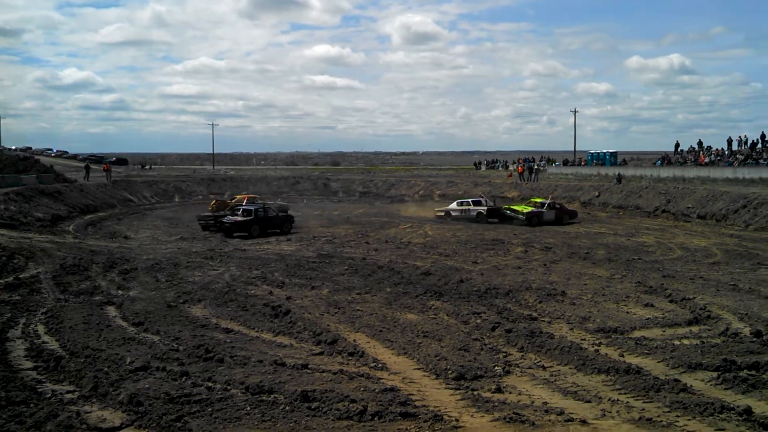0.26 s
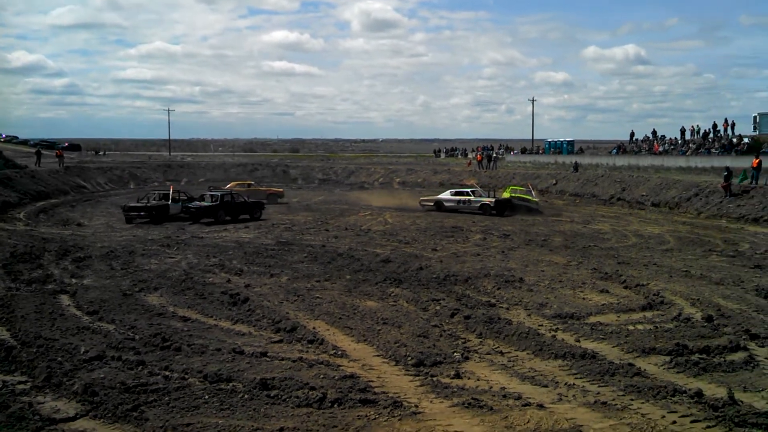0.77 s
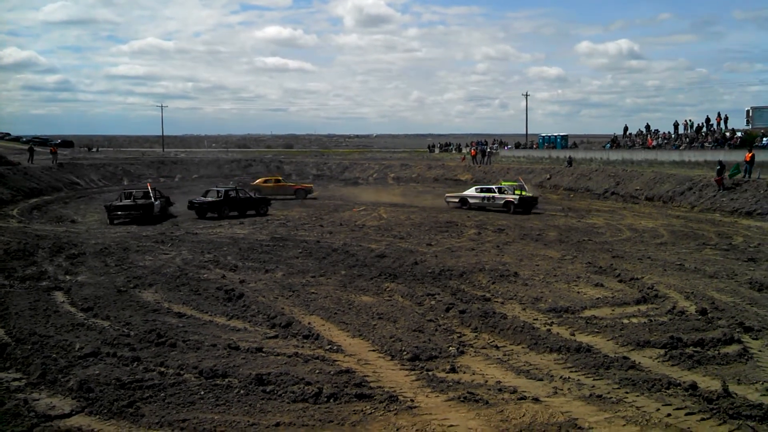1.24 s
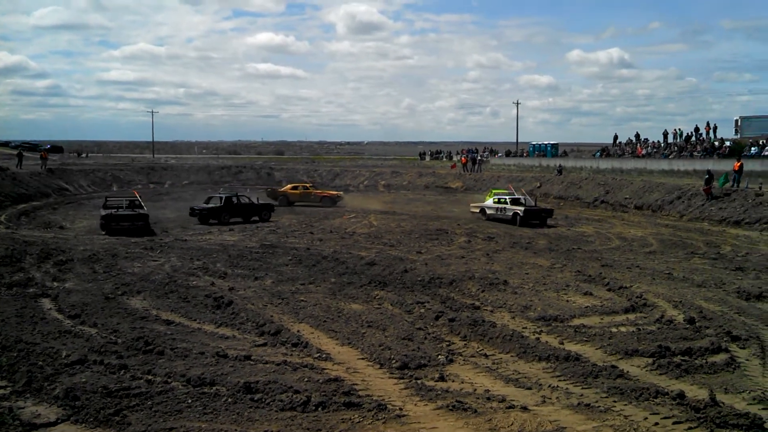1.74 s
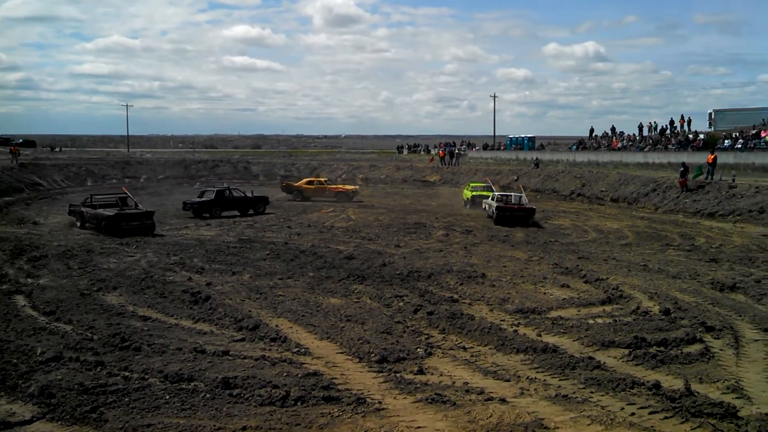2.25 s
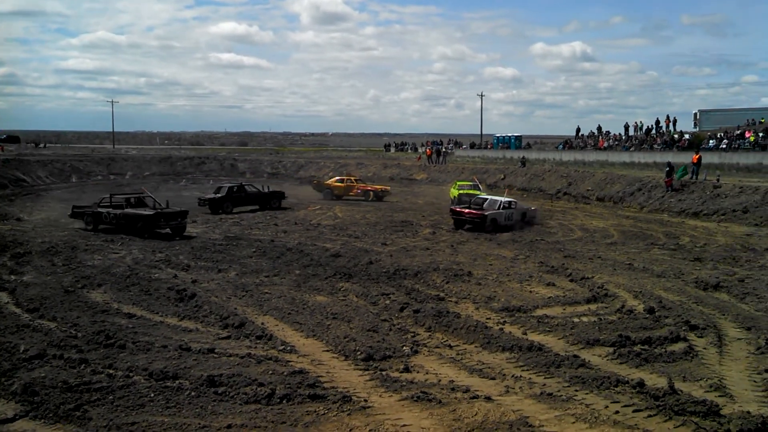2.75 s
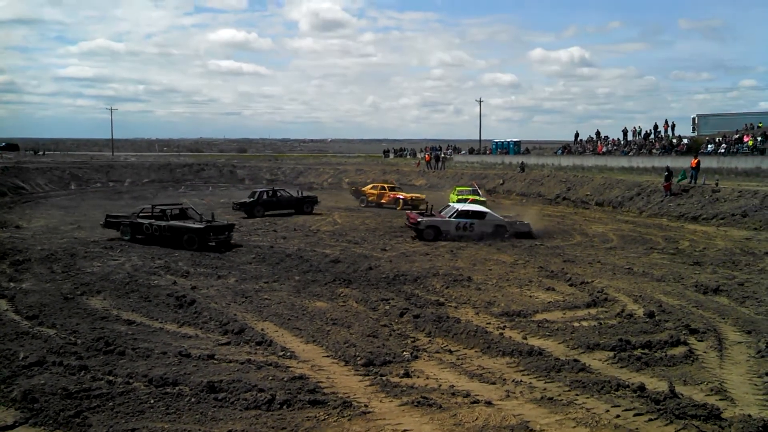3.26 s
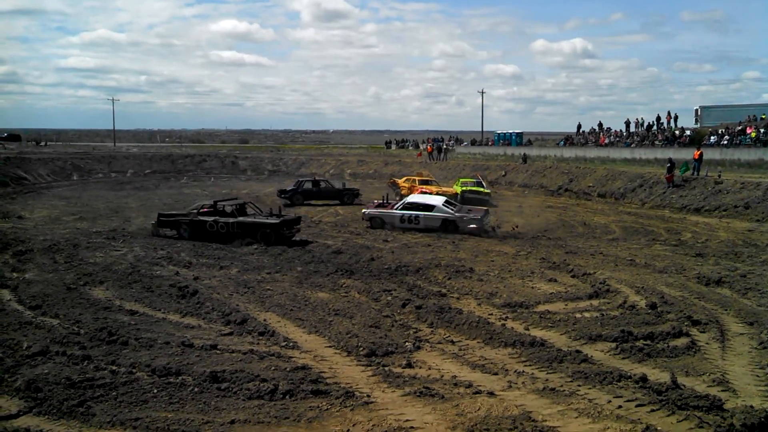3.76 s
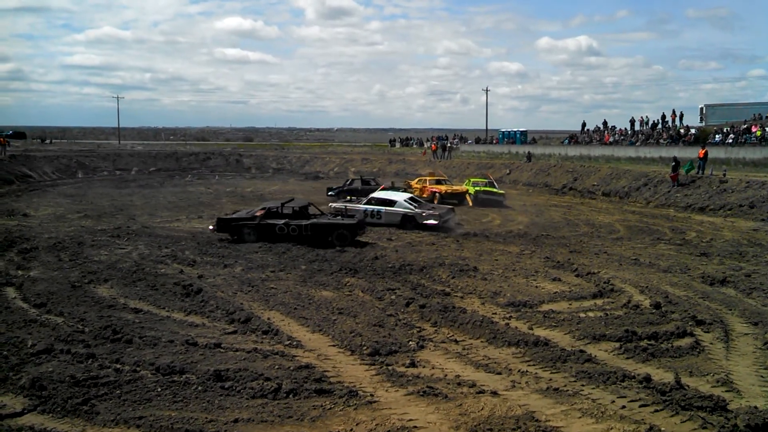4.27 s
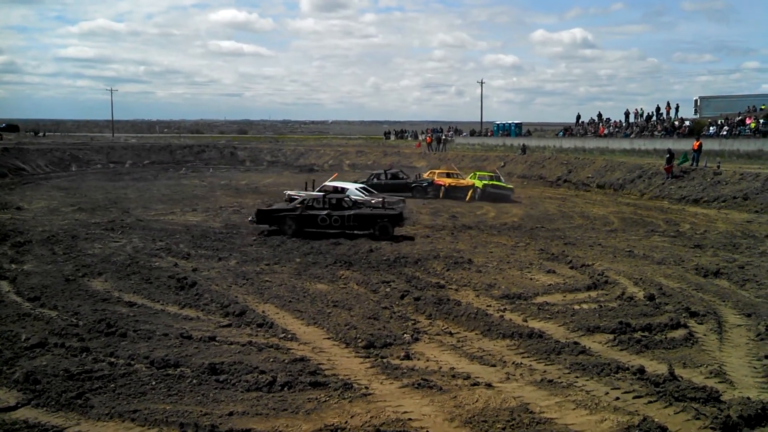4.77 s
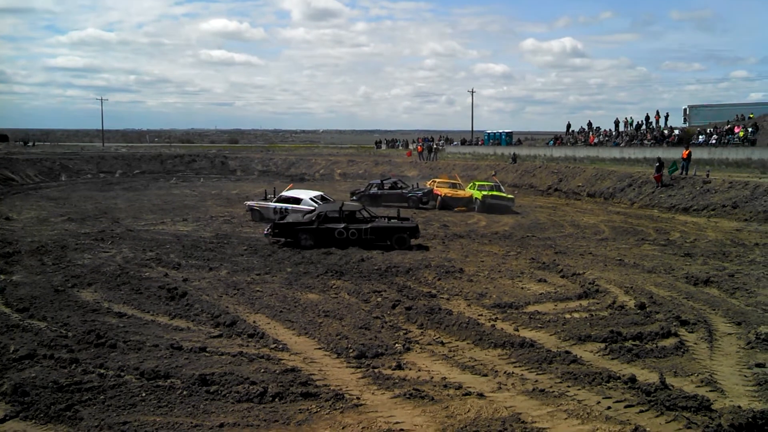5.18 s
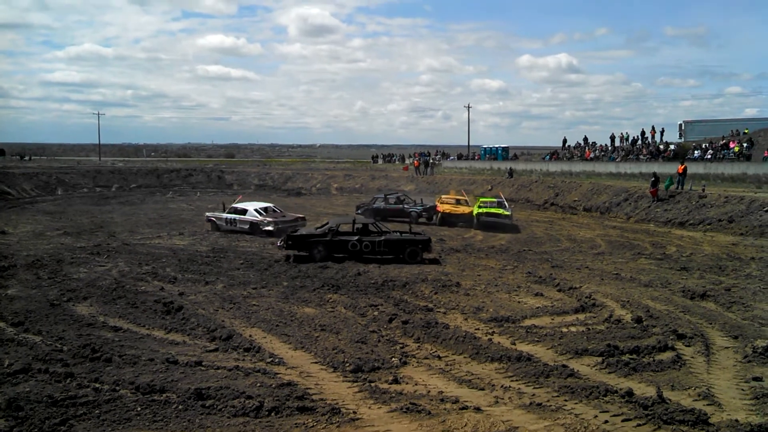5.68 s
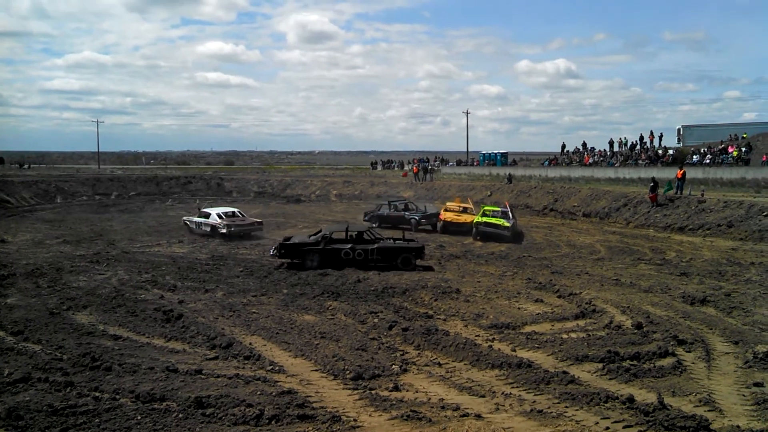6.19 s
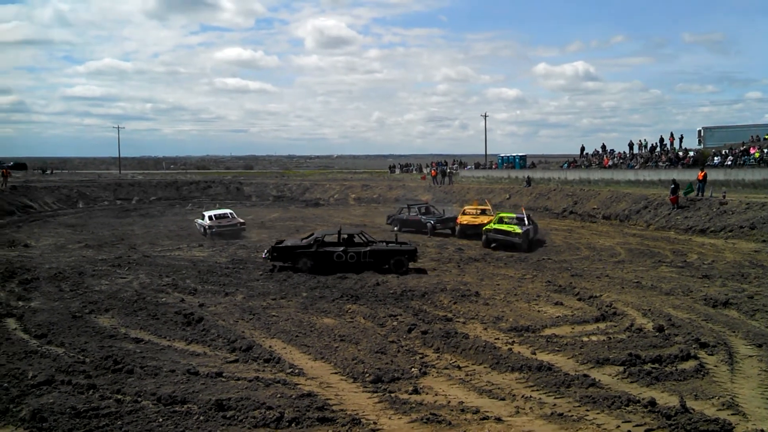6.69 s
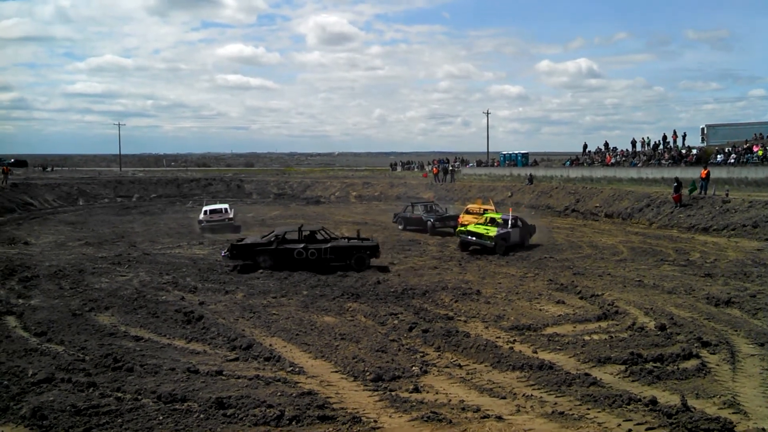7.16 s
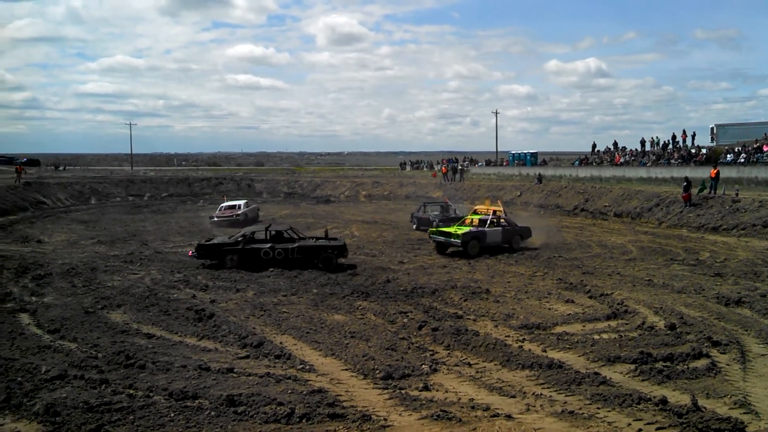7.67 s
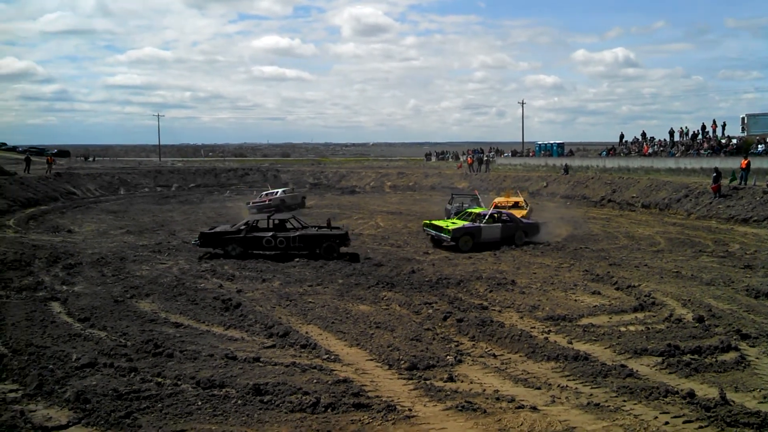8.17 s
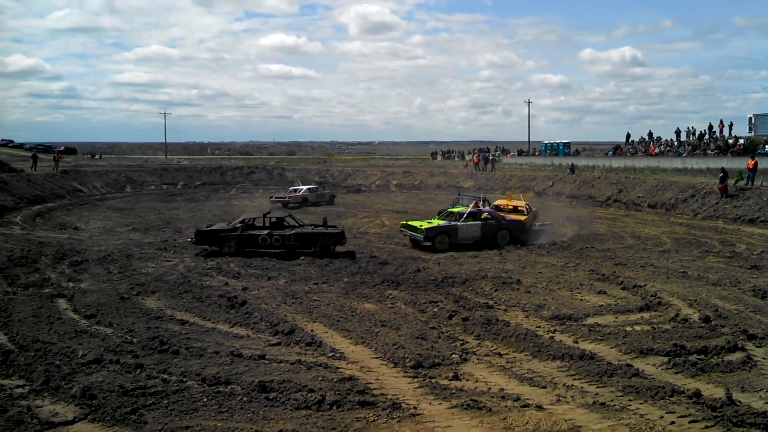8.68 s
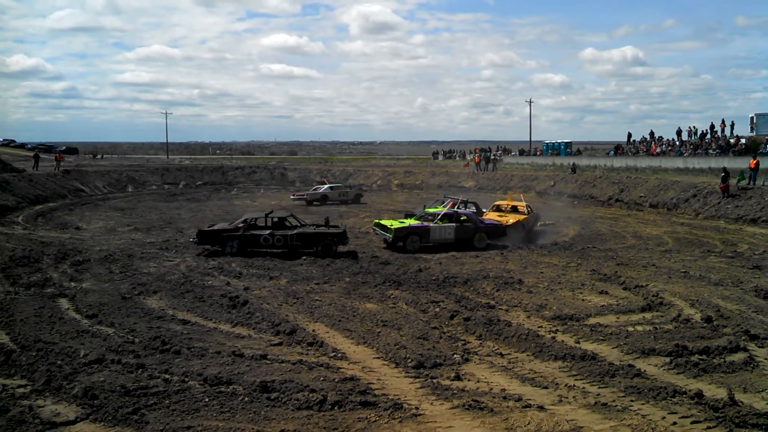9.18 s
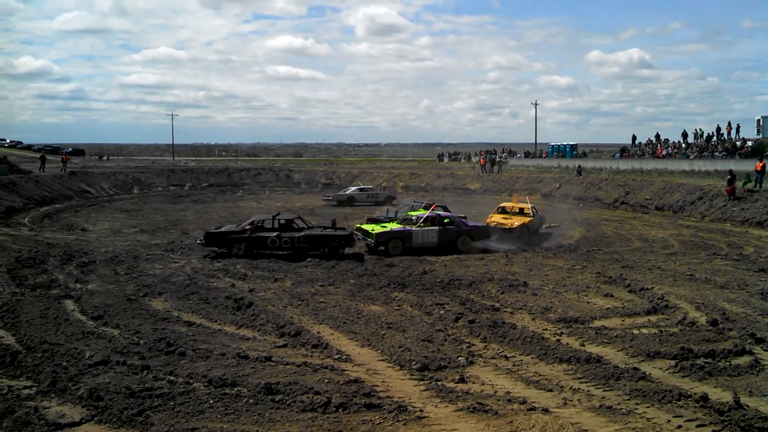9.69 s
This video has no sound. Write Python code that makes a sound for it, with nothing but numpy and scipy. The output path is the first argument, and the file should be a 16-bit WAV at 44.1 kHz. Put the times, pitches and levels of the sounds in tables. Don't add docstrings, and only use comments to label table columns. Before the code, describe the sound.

Old unmuffled eight-cylinder cars rev hard in overlapping bursts across an open dirt arena, exhausts rasping, popping and spitting over a distant engine roar.

```python
import sys
import numpy as np
from scipy import signal
from scipy.fft import rfft, irfft, next_fast_len
from scipy.io import wavfile
from scipy.ndimage import uniform_filter1d

SR = 44100
rng = np.random.default_rng(int(sys.argv[2]) if len(sys.argv) > 2 else 0)


def file_out(sig):
    cols = np.atleast_2d(sig).T
    lim = np.clip(cols, -1, 1)
    pcm = np.round(lim * 32767).astype(np.int16)
    wavfile.write(sys.argv[1], SR, pcm)


def magnitude_from_level(level_db):
    exponent = np.asarray(level_db, float) / 20
    return 10 ** exponent


N = 438348
FREQ = np.maximum(np.fft.rfftfreq(next_fast_len(N + 4096), 1 / SR), 1)


def read(table, column=1):
    rows = np.array(table, float)
    return np.interp(np.log(FREQ), np.log(rows[:, 0]), rows[:, column])


def causal(db):
    cepstrum = irfft(db * np.log(10) / 20)
    half = len(cepstrum) // 2
    cepstrum[1:half] *= 2
    cepstrum[half + 1:] = 0
    return np.exp(rfft(cepstrum))


def through(x, response):
    size = 2 * (len(FREQ) - 1)
    return irfft(rfft(x, size) * response, size)[..., :N]


def unit(x):
    return x / np.sqrt(np.mean(x ** 2))


def unit_gain(response):
    return np.sqrt(np.mean(abs(response) ** 2))


def walk(rate, size=N):
    hold = int(SR / rate)
    values = rng.standard_normal(size // hold + 1)
    steps = np.repeat(values, hold)
    slewed = uniform_filter1d(uniform_filter1d(steps, hold), hold)
    return 1.3 * slewed[:size]


def port_noise(alike, size=N):
    same, own = rng.standard_normal((2, size))
    return np.array([same, alike * same + np.sqrt(1 - min(alike, 1) ** 2) * own])


def far_cars():
    # t/s, roar level/dB
    roar_levels = [(0.0, -12.5), (0.58, -16.5), (0.72, -24), (1.0, -22), (1.35, -15), (2.08, -12.5),
                   (3.18, -12.5), (3.76, -18), (4.18, -10.5), (4.43, -19), (5.07, -17), (5.73, -18.5),
                   (6.31, -12.5), (7.06, -16), (8.69, -16.5), (9.14, -22.5), (9.47, -16), (9.63, -19),
                   (9.94, -15)]
    # f/Hz, level/dB
    roar_colour = [(30, -8), (100, 3), (300, -2), (1000, -3), (3000, -5.5), (8000, -12.5), (16000, -11)]
    s, level_db = np.transpose(roar_levels)
    db = np.interp(np.arange(N) / SR, s, level_db)
    colour = magnitude_from_level(read(roar_colour))
    roar = 0
    for octave, hz in enumerate(45 * 2. ** np.arange(9)):
        band = np.exp(-np.log2(FREQ / hz) ** 2 / .5) * colour
        dulling_db = 0.03 * octave * (db - db.mean())
        swell_db = 1.6 * walk(2.97) + 1.87 * walk(25) + dulling_db
        alike = 1 / (1 + (hz / 2500) ** 2)
        roar = roar + magnitude_from_level(swell_db) * through(port_noise(alike), band)
    return magnitude_from_level(-11.5 + db) * unit(roar)


def pops():
    # t/s, peak level/dB, thump minus crack/dB
    pop_events = [(0.6439, -19.5, -15), (0.7116, -18.5, 3), (0.9994, -23, -4), (1.0334, -23, -4),
                  (1.116, -24, -3), (1.1689, -17, -8), (1.236, -31, 0), (1.4994, -17, -8), (2.5694, -25, 7),
                  (3.3083, -18, 3), (3.873, -28, 24), (4.1779, -23, 16), (4.3997, -27, -1),
                  (4.5635, -32, 8), (4.6204, -25, 14), (5.0895, -14, -1), (5.1493, -13, -12),
                  (5.2008, -22, 7), (5.2894, -36, -6), (6.8189, -20, 22), (7.3666, -37, 14)]
    size = 2000
    out, t = np.zeros((2, N + size)), np.arange(size) / SR
    for s, db, thump_db in pop_events:
        start = int(s * SR)
        crack = 1.7 * np.exp(-t / .003) * uniform_filter1d(rng.standard_normal((2, size)), 3)
        thump = magnitude_from_level(thump_db - 21.5) * np.exp(-t / 0.0023) * np.sin(2 * np.pi * 600 * t)
        out[:, start:start + size] += magnitude_from_level(db + 1.5) * (crack + thump)
    return out[:, :N]


def ticks():
    # t/s, peak level/dB
    spit_events = [(1.069, -20), (1.113, -20), (1.1529, -15), (1.1704, -21), (1.1883, -17), (1.234, -14),
                   (1.4512, -18), (1.7088, -18), (1.8129, -26), (1.868, -15), (1.9212, -22), (2.3361, -20),
                   (2.4101, -19), (2.8336, -22), (2.9833, -18), (3.0047, -20), (3.1932, -16), (3.2851, -14),
                   (3.3305, -11), (4.1172, -19), (4.207, -16), (4.402, -17), (4.5642, -16), (4.6017, -20),
                   (4.6245, -16), (4.6589, -14), (4.6754, -10), (4.6954, -10), (4.735, -12), (4.7832, -12),
                   (4.8181, -10.5), (4.856, -12), (4.8924, -17), (4.9149, -18), (4.9255, -19),
                   (4.9628, -16), (5.0376, -24), (5.09, -12), (5.1384, -11), (5.2356, -17), (5.2815, -12),
                   (5.3384, -23), (6.5487, -17), (6.8894, -20), (7.293, -17), (7.7479, -18), (8.0183, -31),
                   (8.644, -27), (9.3542, -21), (9.7339, -32)]
    # t/s, peak level/dB
    coasting_spits = [(0.66, -21), (0.6866, -18), (0.6954, -18), (0.8345, -39), (0.855, -37), (0.8744, -37),
                      (0.9133, -24), (0.9652, -29), (0.9844, -33), (1.049, -20), (1.2044, -18),
                      (1.252, -27), (1.285, -16), (1.3603, -23), (1.479, -21)]
    size = 600
    out, t = np.zeros((2, N + size)), np.arange(size) / SR
    shape = (1 - np.exp(-t / 0.00044)) * np.exp(-t / 0.0042)
    for s, db in [*spit_events, *coasting_spits]:
        start = int(s * SR)
        noise = uniform_filter1d(rng.standard_normal((2, size + 2)), size=3)
        spit = np.diff(noise, n=1)[:, :size] * shape
        out[:, start:start + size] += magnitude_from_level(db + 5.0) * (0.4 * spit[0] + spit)
    return out[:, :N]


def firings(cycles):
    cylinder_levels = [4.5, -1, 2, 5, -4.5, 3.5, -4, 3]
    far_bank = np.array([0, 1, 0, 0, 1, 0, 1, 1])
    at = np.flatnonzero(np.diff(np.floor(8 * cycles))) + 1
    cylinder = np.arange(len(at)) % 8
    strength_chance, time_chance = rng.standard_normal((2, len(at)))
    strength = magnitude_from_level(np.take(cylinder_levels, cylinder) + 1.2 * strength_chance)
    delay_ms = .6 * np.take(far_bank, cylinder) + .08 * time_chance
    place = at + delay_ms * SR / 1000
    n = len(cycles)
    return np.bincount(np.clip(place, 0, n - 1).astype(int), strength, n)


def pipe_note(pulses, pipe_hz, width_hz, pipe_db):
    # f/Hz, level/dB
    exhaust_colour = [(30, 3), (100, 2), (400, -1.5), (900, -4.5), (1800, -9), (3500, -26), (8000, -40)]
    ring = irfft(causal(read(exhaust_colour)))[:4096]
    pressure = pulses - uniform_filter1d(pulses, size=4000)
    note = signal.fftconvolve(pressure, ring)[:len(pulses)]
    b, a = signal.iirpeak(pipe_hz, pipe_hz / width_hz, fs=SR)
    note = note + magnitude_from_level(pipe_db) * signal.lfilter(b, a, note)
    return note / np.sqrt(uniform_filter1d(note ** 2, size=9000))


def locked(exhaust, turns, db):
    wave = np.array([np.cos(2 * np.pi * turns), np.sin(2 * np.pi * turns)])
    left = 2 * np.sum(uniform_filter1d(exhaust * wave, size=4000) * wave, axis=0)
    return magnitude_from_level(db) * wave[0] - left


def gas_puffs(pulses):
    n = len(pulses)
    uneven = pulses * magnitude_from_level(1.0 * walk(200, size=n))
    puff = signal.lfilter([1], [1, -np.exp(-1 / (0.0026 * SR))], uneven)
    puff = uniform_filter1d(puff, size=24)
    return puff / np.sqrt(uniform_filter1d(puff ** 2, size=6000))


def car(curve, layers, orders, pipe_hz, width_hz, pipe_db, lag):
    open_levels = {"a": (-15.5, -28, -28.5, -23), "b": (-29.5, -47, -25.5, -7), "l": (-16, -32.5, -28.5, 8),
                   "j": (-16, -28, -29.5, 12), "k": (-16, -29.5, -31, -3), "c": (-20.5, -28.5, -24.5, 28),
                   "d": (-19.5, -30, -34.5, -18), "m": (-21.5, -28.5, -31, 50), "e": (-18, -20, -29, 16),
                   "f": (-22, -33.5, -25.5, 12), "g": (-18, -31, -26.5, -1), "n": (-22.5, -34.5, -26.5, 10),
                   "h": (-21, -36, -26.5, 17.5), "o": (-22, -40, -27, 3), "p": (-21.5, -36, -25, 5),
                   "i": (-19.5, -32.5, -15, -2)}
    s, hz, throttle_db = np.transpose(curve)
    open_db, gas_db, tone_db, loss_db = open_levels[layers]
    exhaust_db = open_db + throttle_db
    gas_db = gas_db + 1.87 * throttle_db
    tone_db = tone_db + 0.73 * throttle_db + loss_db * np.log2(hz / hz.max())
    start, end = int(s[0] * SR), min(int(s[-1] * SR), N)
    t = np.arange(start, end) / SR
    n = len(t)

    cycle_hz = np.interp(t, s, hz) * (1 + .003 * walk(15, size=n))
    cycles = np.cumsum(cycle_hz) / SR
    pulses = firings(cycles)
    exhaust = magnitude_from_level(np.interp(t, s, exhaust_db) - 13.5) * pipe_note(pulses, pipe_hz, width_hz, pipe_db)
    tone_db = np.interp(t, s, tone_db) - 8.5
    tones = 0
    for order, level_db in orders:
        turns = order * cycles + rng.random()
        tones = tones + locked(exhaust, turns, tone_db + level_db + 2 * walk(12, size=n))
    exhaust = exhaust + tones
    gas = magnitude_from_level(np.interp(t, s, gas_db)) * gas_puffs(pulses) * port_noise(0.33, size=n)

    since = t - s[0] + (s[0] == 0)
    left = s[-1] - t + (s[-1] > 9.9)
    fade = np.clip(np.minimum(since, left) / .04, 0, 1)
    second = np.interp(np.arange(n) - lag / 2, np.arange(n), exhaust)
    return np.pad(fade * np.array([[exhaust, second], gas]), [(0, 0), (0, 0), (start, N - end)])


def bursts():
    # t/s, cycle rate f/Hz, throttle level/dB against open
    rev_a = [
        (0.0, 31.8, 0),
        (0.19, 36, 1.5),
        (0.31, 35.06, 1),
        (0.4, 32.6, 1.3),
        (0.5, 30.86, 0),
        (0.57, 31.13, 0.5),
        (0.62, 31.93, -2.5),
        (0.68, 31.6, -32),
    ]
    rev_b = [
        (0.64, 15.2, -5),
        (0.72, 13.7, 6),
        (0.81, 16, -4.5),
        (0.99, 19.4, -3),
        (1.1, 19, -21),
    ]
    rev_l = [
        (0.98, 18.2, -10),
        (1.11, 22.2, -1.5),
        (1.32, 20.8, -6),
        (1.44, 20.5, 0),
        (1.6, 21.8, -0.5),
        (1.85, 20.2, -1.5),
        (1.9, 20.6, 2),
        (2.0, 21.8, 0),
        (2.1, 22.3, 4),
    ]
    rev_j = [
        (2.05, 22.2, -4),
        (2.16, 23.6, 0),
        (2.3, 25.11, -1.5),
        (2.48, 27.82, 1.5),
        (2.62, 29.32, 2),
        (2.73, 29.27, -2),
        (2.8, 28.65, -27),
    ]
    rev_k = [
        (2.78, 27.18, -5),
        (2.85, 27.5, -1),
        (2.95, 28.65, 1.5),
        (3.05, 29.85, 1.5),
        (3.15, 31.45, 1),
        (3.24, 32.2, -0.5),
        (3.32, 31.42, -10),
        (3.4, 30.4, 7),
    ]
    rev_c = [
        (3.2, 20.16, -1.5),
        (3.33, 22.85, -1),
        (3.39, 24.43, -0.2),
        (3.54, 26.48, -1),
        (3.62, 26.7, 0),
        (3.8, 25, -8),
    ]
    rev_d = [
        (3.6, 22.21, -3),
        (3.74, 22.25, -10),
        (3.78, 22.57, -10),
        (4.09, 24.52, 0.5),
        (4.15, 24.83, 0.5),
        (4.3, 25.13, -1.5),
        (4.42, 25, 0.5),
    ]
    rev_m = [
        (4.2, 26.4, -14),
        (4.3, 27.37, -7),
        (4.57, 26.57, -1.5),
        (4.82, 27.85, -1),
        (5.05, 26.4, 0.5),
        (5.3, 25.12, 0),
        (5.53, 25.17, -0.5),
        (5.68, 24.9, -3),
        (5.9, 23.84, -0.5),
    ]
    rev_e = [
        (5.15, 20.12, -2),
        (5.2, 20.65, -4),
        (5.35, 22.5, -9.5),
        (5.57, 25.42, -4),
        (5.7, 25.03, -38.5),
    ]
    rev_f = [
        (5.7, 18.3, -15.5),
        (5.9, 21.5, -0.5),
        (6, 23.2, -2.5),
        (6.45, 23.6, -1),
        (6.65, 23.9, -2),
        (6.85, 23.5, 1),
        (7.3, 23.1, -6.5),
        (7.5, 21, -13),
    ]
    rev_g = [
        (6.85, 26.9, -8),
        (7.0, 30.6, 1.5),
        (7.12, 34, 2),
        (7.26, 35.11, 0),
        (7.58, 32.4, 0),
        (7.68, 30.8, 1),
        (7.78, 28.35, -6),
        (7.92, 25.5, -8),
    ]
    rev_n = [
        (7.9, 24.08, 5),
        (7.96, 23.94, 1),
        (8.08, 24.32, -0.5),
        (8.35, 23.46, 0),
        (8.42, 23.77, -4),
        (8.63, 25.47, 1),
        (8.88, 25.92, -0.5),
        (9.0, 25.3, -18),
    ]
    rev_h = [
        (7.4, 28.1, -19),
        (7.48, 28.52, 0),
        (7.84, 34.2, 3.5),
        (7.95, 34.73, 1.5),
        (8.25, 39.1, 1.5),
        (8.45, 39.14, 0.5),
        (8.62, 38.5, 0.5),
    ]
    rev_o = [
        (8.58, 39.48, 1),
        (8.75, 41.63, 0),
        (8.89, 42.3, 3.5),
        (9.02, 41.5, -3),
    ]
    rev_p = [
        (8.98, 42.54, -2.86),
        (9.2, 41.78, 0.66),
        (9.4, 41.3, 1.7),
        (9.52, 39.86, -2.1),
    ]
    rev_i = [
        (9.44, 40.06, -35),
        (9.49, 39.68, 2),
        (9.53, 39.4, -3),
        (9.94, 40.06, -0.5),
    ]
    tones_first = {"a": [(3, -16), (5, -4), (8, -10), (11, -1), (13, 4), (16, -11), (17, -6), (19, -7), (21, -8),
                   (23, -13), (24, -12), (25, -20), (27, -20)], "j": [(3, -16), (4, -12), (5, -6), (6, -10),
                   (7, -8), (8, 5), (11, -2), (13, 0), (16, 4), (19, -8), (21, -1), (22, -1), (23, -8), (24, 1),
                   (26, -1), (27, -6), (28, 0)], "k": [(4, -6), (5, 5), (6, -6), (8, -2), (11, 1), (13, 5),
                   (16, -3), (18, -2), (19, -2), (21, 0), (22, -1), (23, -7), (24, -1), (27, -7)], "d": [(5, -2),
                   (8, -2), (13, -4), (21, 5)], "m": [(4, -6), (5, -3), (6, -3), (13, 7), (16, -2), (17, -1),
                   (18, 1), (19, 1), (20, 1), (21, 2), (22, -1), (24, -2), (26, -1)], "g": [(5, -5), (8, -2),
                   (13, 2), (15, -5), (16, -5), (17, -3), (18, -5), (19, -7), (20, -8), (21, 1), (22, -11),
                   (23, -8), (24, -6), (25, -6)]}
    tones_more = {"l": [(5, -10), (6, -10), (7, -10), (8, 4), (9, -12), (19, -10), (21, -11), (29, -12)],
                  "b": [(5, -12), (8, -3), (21, -16)], "n": [(8, -2), (13, -4), (16, -10), (21, -8)],
                  "c": [(5, -1), (8, -19), (13, -7)], "e": [(5, 1.5), (8, -22), (13, -10)], "f": [(3, -14),
                  (4, -12), (5, 4), (6, -12), (7, -10), (8, -4), (15, -8), (16, -7), (20, -9), (25, -9), (29, -7),
                  (31, -8), (33, -6)], "h": [(2, -6), (3, -5), (4, 2), (5, -5), (6, -14), (7, -5), (8, -2)],
                  "o": [(2, -5), (3, -4), (4, -3), (5, 2), (6, -6), (7, -10), (8, -1), (13, -3)], "p": [(2, -5),
                  (3, -4), (4, 2), (5, -4), (6, -7), (7, -3), (8, -12)], "i": [(2, -21), (3, -14.5), (5, 1.5),
                  (7, -11), (8, -18), (19, -25)]}
    return [
        (rev_a, "a", tones_first["a"], 420, 100, 6, -1.5),
        (rev_b, "b", tones_more["b"], 170, 60, 2, 1.5),
        (rev_l, "l", tones_more["l"], 170, 60, 2, 1.5),
        (rev_j, "j", tones_first["j"], 650, 150, 3, 1.5),
        (rev_k, "k", tones_first["k"], 650, 150, 3, 1.5),
        (rev_c, "c", tones_more["c"], 690, 150, 8, 2.5),
        (rev_d, "d", tones_first["d"], 1550, 250, 12, .3),
        (rev_m, "m", tones_first["m"], 550, 150, 4, .3),
        (rev_e, "e", tones_more["e"], 700, 150, 8, -1.5),
        (rev_f, "f", tones_more["f"], 1550, 250, 10, 1.5),
        (rev_g, "g", tones_first["g"], 600, 200, 4, .3),
        (rev_n, "n", tones_more["n"], 600, 200, 4, .3),
        (rev_h, "h", tones_more["h"], 175, 50, 15, 1.5),
        (rev_o, "o", tones_more["o"], 175, 50, 15, 1.5),
        (rev_p, "p", tones_more["p"], 175, 50, 15, 1.5),
        (rev_i, "i", tones_more["i"], 195, 90, 4, 1.5)]


def near_cars():
    # f/Hz, level/dB
    gas_colour = [(300, -14.5), (800, -1.5), (2000, 7), (4000, 9), (6000, 3), (10000, 6), (14000, -7),
                  (16000, -6.5)]
    exhaust, gas = sum(car(*burst) for burst in bursts())
    rasp = causal(read(gas_colour))
    return exhaust + magnitude_from_level(5.5) * through(gas, rasp / unit_gain(rasp))


def scene():
    roar = far_cars()
    near = pops() + ticks() + near_cars()
    echo = np.roll(near, int(.047 * SR), axis=1)
    return roar + near + magnitude_from_level(-16.0) * echo


def roll_off(x):
    return signal.sosfilt(signal.butter(12, 15730, fs=SR, output="sos"), x)


def record(dry):
    # f/Hz, level/dB
    port_colour = [(22, -10), (38, 2), (65, 13), (125, 20), (200, 15), (300, 3), (500, 6.5), (680, 9.5),
                   (1000, 0), (1250, -1), (1520, 1.5), (1740, -5.5), (2000, -0.5), (2500, -2.5),
                   (3200, -7.5)]
    # f/Hz, level/dB, phase/rad
    second_port = [(40, 3, -0.32), (90, 1.06, -0.19), (201, 0.54, -0.02), (295, 3.5, 0.11),
                   (433, 0.8, -0.59), (560, -4.5, 0.18), (673, -0.7, 0.34), (796, 0, 0.074),
                   (1180, 0.5, -0.73), (1680, 2.5, -1.36), (2040, -0.5, -1.03), (2870, -3.8, -.3),
                   (4960, -10, 0.00083), (10000, -10, 0.48)]
    first = causal(read(port_colour)) / (1 + (FREQ / 15150) ** 60)
    second = first * magnitude_from_level(read(second_port)) * np.exp(1j * read(second_port, column=2))
    ports = through(dry, np.array([first, second]))
    wide = ports - np.roll(ports[::-1], 16, axis=1)
    return roll_off(wide)


dry = scene()
out = record(dry)
file_out(out)
```